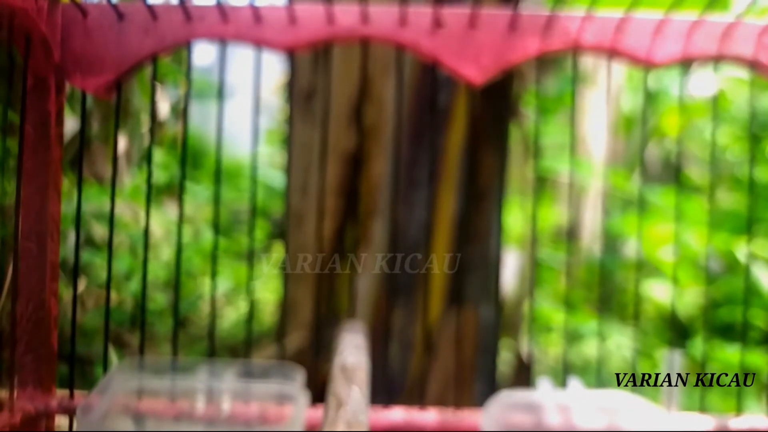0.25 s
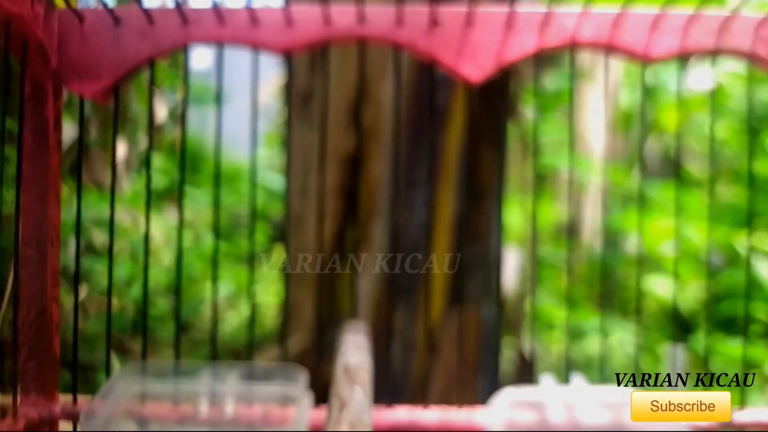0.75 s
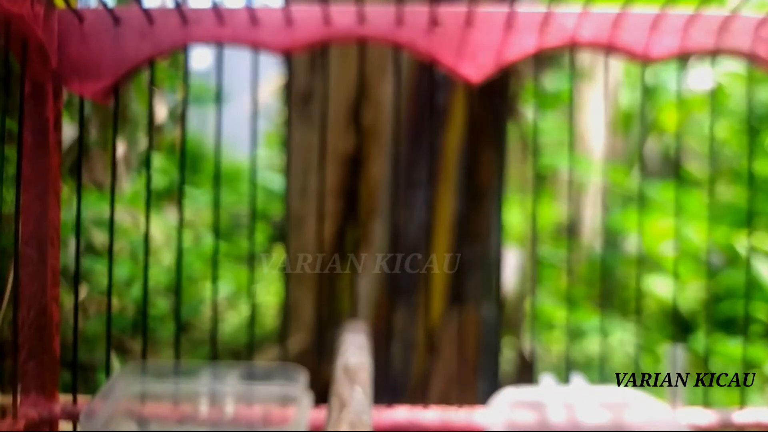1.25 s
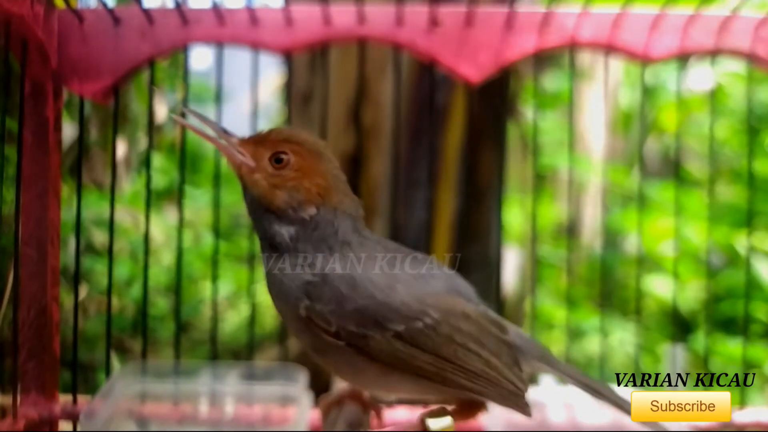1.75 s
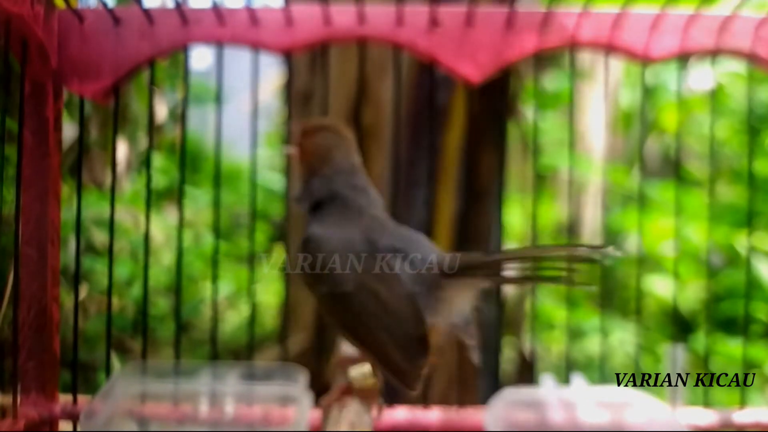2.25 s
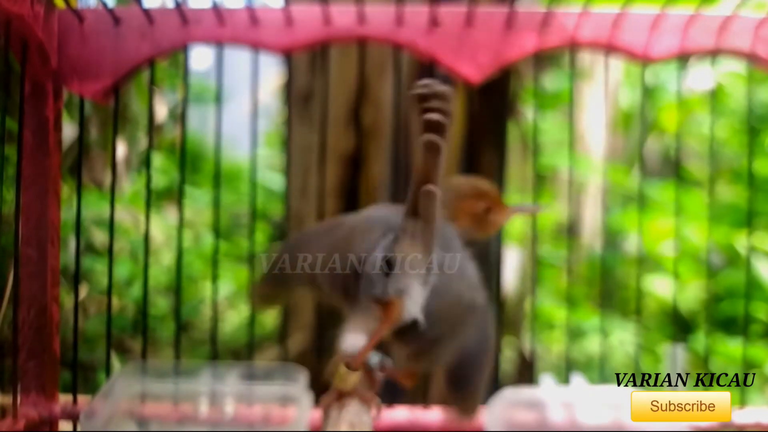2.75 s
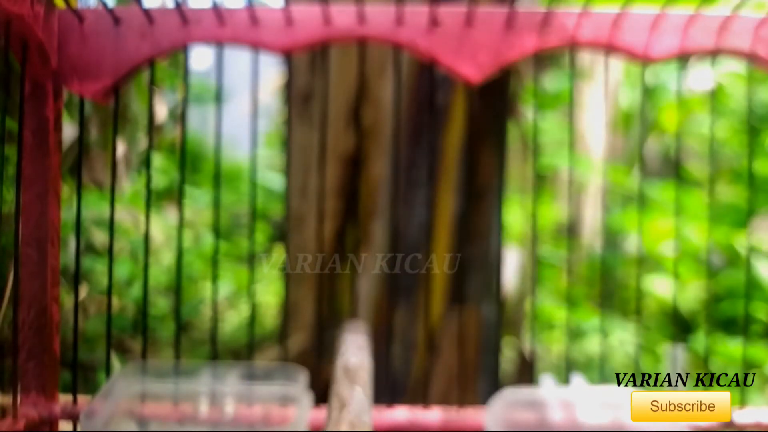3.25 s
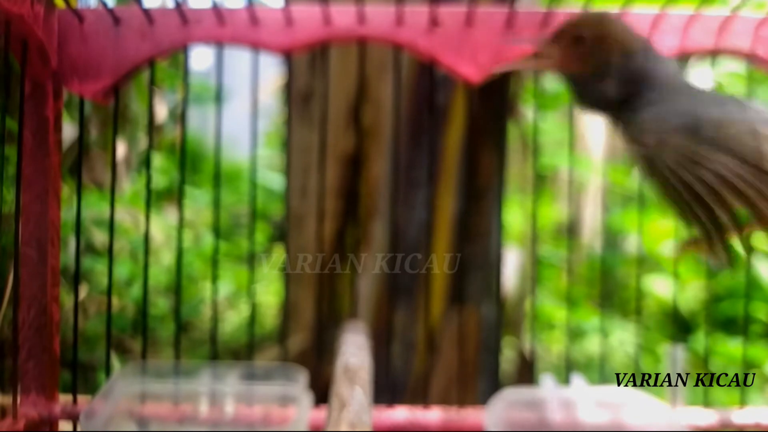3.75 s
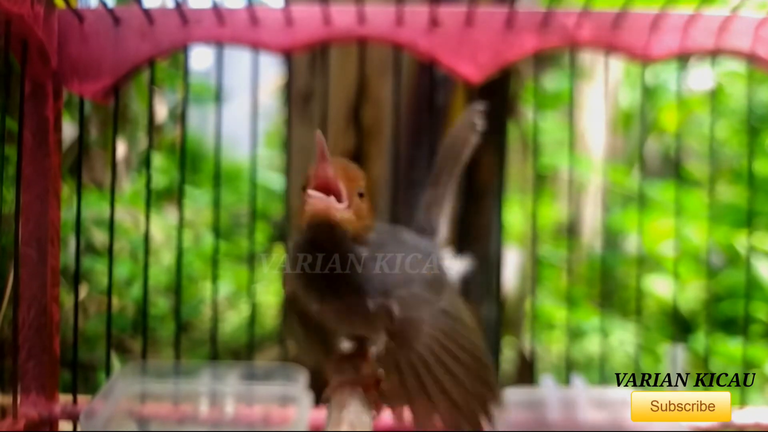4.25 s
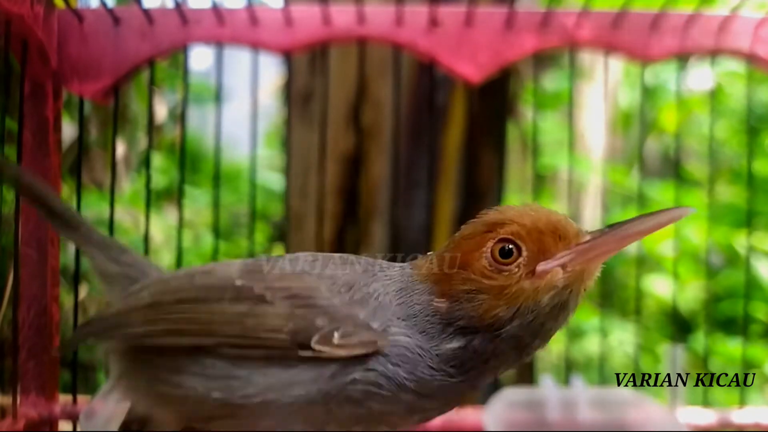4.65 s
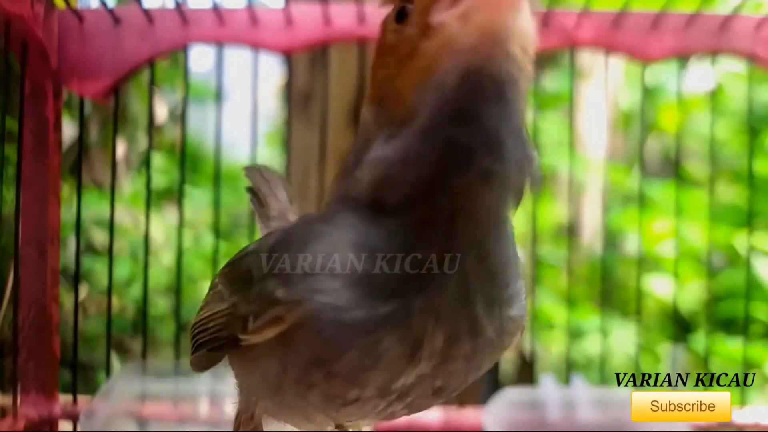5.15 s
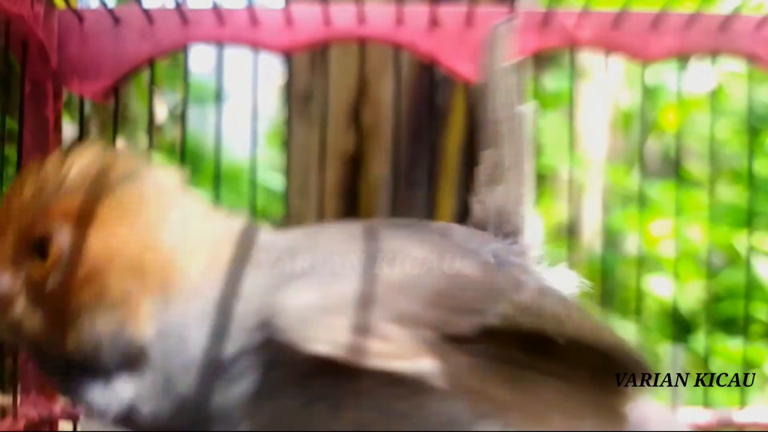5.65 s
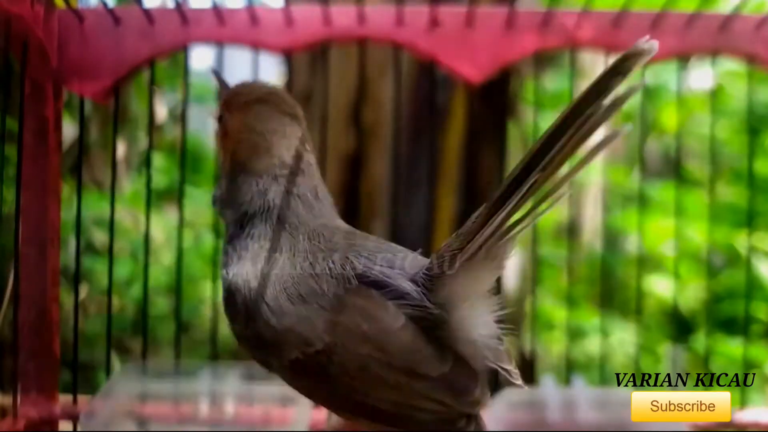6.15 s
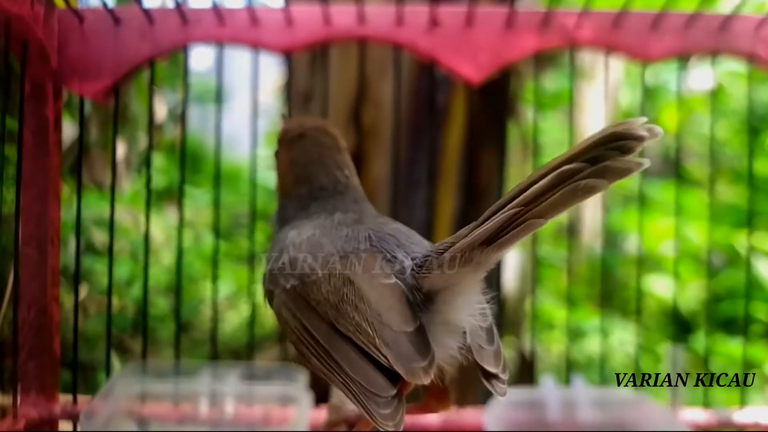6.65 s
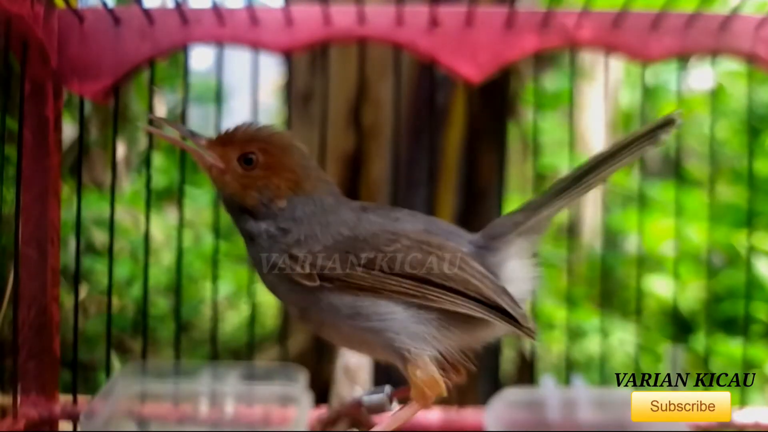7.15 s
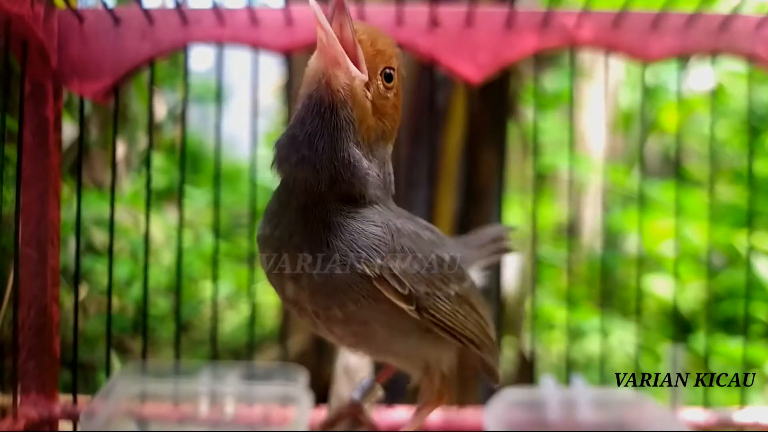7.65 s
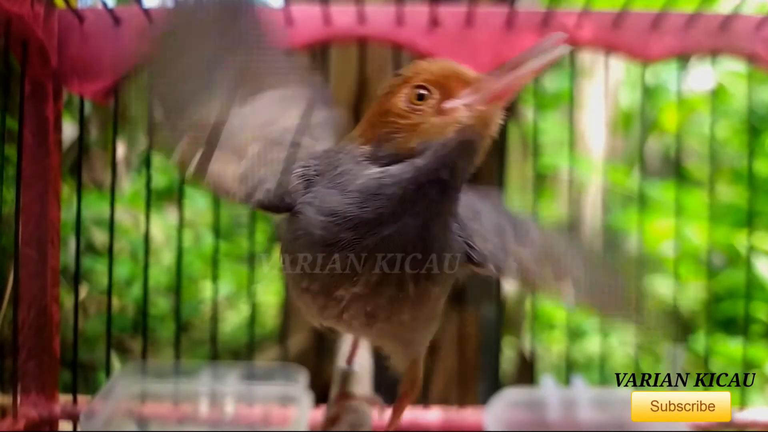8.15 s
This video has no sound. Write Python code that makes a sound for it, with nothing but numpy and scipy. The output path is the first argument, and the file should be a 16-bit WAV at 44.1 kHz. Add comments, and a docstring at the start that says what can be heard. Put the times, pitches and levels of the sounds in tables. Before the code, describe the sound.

A very close, loud small bird sings seven short ringing phrases, roughly one to one and a half seconds apart, shifting between left and right. Hops bring soft feather flutter, dry wing snaps, claw ticks and dull cage knocks. Other birds chatter in quick descending trills with light yard echo, while a distant motor putters low beneath thin open-air noise.

```python
"""A cage in a yard: a tailorbird sings seven times right at the microphone, loud enough to overload it.
Each song is a gliding, partly rough tone: a quick rise, a long level whistle, then a plunge and an arch.
Between songs it hops and snaps its wings in shaped noise bursts; landings ring the cage as decaying sines.
Other tailorbirds further off sing the same song and a trill, with more of the yard's echo.
A distant engine putters in filtered pulses, with a faint sinking whine and a bed of air noise."""
import sys
import numpy as np
from scipy import signal
from scipy.fft import rfft, irfft, next_fast_len
from scipy.io import wavfile
from scipy.ndimage import uniform_filter1d, map_coordinates

SR = 44100
rng = np.random.default_rng(int(sys.argv[2]) if len(sys.argv) > 2 else 0)


def materialize(psi):
    """Save the field psi as 16-bit PCM at rate SR to the path in sys.argv[1].

    A 1-D psi becomes a single channel; in a 2-D psi each row is a channel.
    """
    bounded = np.clip(np.atleast_2d(psi).T, -1, 1)
    quanta = np.round(bounded * 32767).astype(np.int16)
    wavfile.write(sys.argv[1], SR, quanta)


N = 369999


def amp(db):
    """Decibels to gain."""
    return 10 ** (np.asarray(db) / 20)


def unit(x):
    """Scaled to rms 1."""
    return x / np.sqrt(np.mean(x ** 2) + 1e-20)


def along(points, hz):
    """Read (Hz, value) points on a log frequency axis."""
    f, v = np.transpose(points)
    return np.interp(np.log(hz + 1), np.log(f + 1), v)


def curve(rows):
    """(s, value) rows as one value per sample."""
    return np.interp(np.arange(N) / SR, *np.transpose(rows))


def wobble(rate, n):
    """A smooth random curve of n samples, with rate knots a second."""
    knots = rng.standard_normal(int(n * rate / SR) + 4)
    return map_coordinates(knots, [np.arange(n) * rate / SR])


def filtered(x, response):
    """x shaped by a complex response of frequency."""
    n = x.shape[-1]
    m = next_fast_len(n + 2048)
    return irfft(rfft(x, m) * response(np.fft.rfftfreq(m, 1 / SR)), m)[..., :n]


def noise(spectrum, n):
    """Stereo noise of rms 1, most alike in the bass and nearly unrelated in the treble."""
    # left-right correlation: freq_hz, likeness (0-1)
    alike = [(40, 0.27), (120, 1), (400, .45), (1500, 0.1), (8000, 0.11)]

    def mid_side_response(hz):
        turn = np.arccos(np.clip(along(alike, hz), -1, 1)) / 2
        return amp(along(spectrum, hz)) * [np.cos(turn), np.sin(turn)]

    mid, side = filtered(rng.standard_normal((2, n)), mid_side_response)
    return unit(np.array([mid + side, mid - side]))


def add(track, s, sound):
    """Mix a sound into the track at time s."""
    part = track[:, max(round(s * SR), 0):][:, :sound.shape[-1]]
    part += sound[..., :part.shape[1]]


def engine(level_db=4, rumble_db=0, pan_db=-1.1, left_lead_s=.00045):
    """Uneven exhaust puffs from far away, blurred into a low rumble in which single tones swell."""
    # loudness before level_db is added: time_s, level_db
    putter_levels = [(0.0, -52.5), (0.47, -56), (0.84, -55.5), (1.24, -46.5), (1.8, -50), (4.74, -56),
                     (5.07, -52), (5.37, -54.5), (5.98, -51), (6.71, -52.5), (7.03, -48), (7.57, -49.5),
                     (7.97, -50.5), (8.39, -50)]
    # firing rate: time_s, firings_per_s
    firing_rate = [(.8, 19), (1.1, 22.5), (1.5, 22.5), (2.1, 20), (5.8, 21), (8.4, 20)]
    # exhaust colour: freq_hz, relative_level_db (per Hz)
    exhaust_colour = [(15, -45), (25, -16), (80, 0.5), (103, -1.5), (146, -2), (221, -17.5), (248, -20),
                      (365, -26), (425, -39.5), (500, -30.5), (650, -54.5), (1100, -120)]
    # tones that swell in the hum: start_s, length_s, pitch_hz, level_db (before the pan)
    hums = [(0, 0.3143, 77.2, -57), (.87, 0.49, 116, -48), (1.55, 1, 137.5, -53), (8.149, 0.28, 63.2, -48)]

    # one pulse each time the running count of firings passes a whole number
    count = np.floor(np.cumsum(curve(firing_rate)) / SR)
    firings = np.diff(count, prepend=0) * amp(1.0 * wobble(38, N))

    def exhaust_response(hz):
        blur = np.exp(-2j * np.log(hz + 1) ** 2)  # delays each pitch differently
        return amp(along(exhaust_colour, hz)) * blur

    puffs = unit(filtered(firings, exhaust_response))
    rumble = amp(rumble_db) * noise(exhaust_colour, N)
    sound = amp(curve(putter_levels) + level_db) * unit(puffs + rumble)
    for s, length, hz, db in hums:
        n = round(length * SR)
        tone = np.sin(2 * np.pi * hz * np.arange(n) / SR + .4 * wobble(18, n))
        add(sound, s, amp(db) * unit(np.hanning(n) ** .5 * tone))
    left = amp(pan_db) * sound[0]
    right = amp(-pan_db) * np.roll(sound[1], round(left_lead_s * SR))
    return np.array([left, right])


def air(level_db=-60):
    """Open air as broad noise whose level drifts slowly."""
    # air colour: freq_hz, relative_level_db (per Hz)
    air_colour = [(150, -20), (250, 0), (560, -9), (830, -10), (1500, -15), (2400, -15.5), (4000, -18),
                  (7300, -22), (10000, -22), (16000, -30)]
    return amp(level_db + wobble(3.2, N)) * noise(air_colour, N)


def syrinx(shape, length, stretch=1, jitter=0.018, flutter_db=2, rasp_db=-20, doubled_db=-7,
           shimmer_db=6.0, edge_db=3, smear=.9, overtone_smear=0.44):
    """One note of rms 1 from the voice organ: a gliding tone that shakes and hisses where it is rough."""
    # hiss colour: freq_hz, relative_level_db (per Hz)
    rasp_colour = [(400, -18.5), (1300, -11.5), (2500, -4.5), (3800, -3), (4700, -10.5), (6000, -8.5),
                   (7500, -7), (10000, -4.5), (13000, -14), (15300, -18.5)]
    # overtones that pass the throat and open beak: freq_hz, level_db (against the fundamental)
    throat = [(1450, -51.5), (4400, -33.5), (5100, -38.5), (5900, -39.5), (7300, -38), (8800, -39.5),
              (11700, -44.5), (13200, -47.5), (14700, -27.5), (16000, -19.5)]

    n = round(length * SR)
    ms, *columns = np.transpose(shape)
    place = np.linspace(0, ms[-1], n)  # the shape is fitted to the note's length
    hz, db, rough = [uniform_filter1d(np.interp(place, ms, c), size=60) for c in columns]
    drift = .003 * wobble(25, n)
    shake = (0.0016 + jitter * rough) * wobble(900, n)
    hz = stretch * hz * (1 + drift + shake)
    phase = 2 * np.pi * np.cumsum(hz) / SR
    tone = np.sin(phase)
    for halves in 1, 3, 4, 5, 6, 7, 8, 9, 10:
        k = halves / 2  # a slightly doubled period puts weak, fuzzy lines between the overtones
        between = halves % 2
        emphasis = doubled_db if between else edge_db * rough
        level = along(throat, k * hz) + emphasis + shimmer_db * wobble(35, n)
        fuzz = (smear if between else overtone_smear) * wobble(160, n)
        tone = tone + amp(level) * np.sin(k * phase + fuzz) * (k * hz < SR / 2)
    flutter = .5 * wobble(35, n) + flutter_db * rough * wobble(700, n)
    loudness = amp(db + flutter) * signal.windows.tukey(n, 80 / n)  # 40-sample fades
    return unit(loudness * (unit(tone) + amp(rasp_db) * rough * noise(rasp_colour, n)))


def ports(note, pan_db, lead_ms, bounce_db, reach):
    """A note at the two microphones: surfaces within reach (s) comb each side differently, and one side leads."""
    # how much of lead_ms each pitch keeps: freq_hz, share (0-1)
    lead_share = [(3000, 1), (4200, 0.42)]

    sides = np.pad(note, [(0, 0), (0, 512)])
    bounces = np.zeros((2, 512))
    bounces[:, 0] = 1  # the direct sound
    delays = np.clip(reach * SR * rng.random((2, 5)), 20, 511).astype(int)
    bounces[[[0], [1]], delays] = amp(bounce_db) * rng.standard_normal(delays.shape)
    combed = signal.fftconvolve(sides, bounces, axes=1)[:, :sides.shape[1]]
    # combing leaves each side's level as it was
    combed = combed * sides.std(axis=1, keepdims=True) / combed.std(axis=1, keepdims=True)
    half = np.array([[.5], [-.5]])  # pan and lead are split between left and right

    def lead_response(hz):
        return np.exp(2j * np.pi * hz * half * along(lead_share, hz) * lead_ms / 1000)

    return amp(half * pan_db) * filtered(combed, lead_response)


def song(rises, whistles, arches, bounce_db, reach):
    """A tailorbird's three notes on fixed shapes; the glides are combed, the held note stays more even."""
    # note shapes: into_note_ms (fitted to each length), pitch_hz (before the drift below),
    # relative_level_db, roughness (0-1)
    rise_shape = [(0, 1850, -27, .3), (3.885, 2280, -9, 1), (10.53, 2950, -1, 0), (18.5, 3450, 2.5, 0.7),
                  (24.115, 3600, -23.5, .7)]
    whistle_shape = [(0, 4400, -13, 0.72), (2.504, 4250, 2, .6), (10.6, 3500, 2.5, 1),
                     (21.85, 2740, -5.5, 1), (37, 2640, -8.5, .15), (79.64, 2865, -2.5, 0.046),
                     (119, 2908, 0.5, 0.04), (182.4, 2935, 2, 0.046), (193.2, 2800, -18, .2)]
    arch_shape = [(0, 4400, -5, 0.67), (1.92, 4100, 4, 0.33), (8.96, 2900, 6.5, 1),
                  (21.56, 1660, -14, 0.74), (39.26, 2100, -5, 1), (52.229, 2750, 3.5, 0.45),
                  (66.2, 2600, 2.5, 0.61), (85.4, 1960, -8, 0.91), (95.4, 1527, -26.5, 0.49)]
    # the voice sags through most of the bout, then recovers: time_s, pitch_factor
    pitch_drift = [(.4, 1.005), (1.4, 1.004), (2.4, 1.003), (3.9, .997), (7.8, 1)]

    track = np.zeros((2, N))
    # shape, notes, comb_db (added to bounce_db)
    parts = (rise_shape, rises, 0), (whistle_shape, whistles, -12), (arch_shape, arches, -2)
    for shape, notes, comb_db in parts:
        for s, length, db, pan_db, lead_ms in notes:
            note = syrinx(shape, length, stretch=np.interp(s, *np.transpose(pitch_drift)))
            add(track, s, amp(db) * ports(note, pan_db, lead_ms, bounce_db + comb_db, reach))
    return track


def far_song(whistle_db=-5, left_lead_ms=0.11):
    """Another tailorbird sings the same three notes in a fixed rhythm; its whistle is weaker than its rise."""
    # songs: arch_start_s, opening_level_db (rise; whistle_db is added for the whistle), arch_level_db
    far_songs = [(.03, -70, -60.5), (1.052, -66, -53), (3.455, -54, -57), (4.908, -52, -54.5),
                 (7.333, -53, -59.5)]
    # its rise, whistle and arch: after_arch_start_s, length_s
    far_rhythm = [(-.26, .027), (-.22, .175), (0, .085)]

    notes = [[], [], []]
    for s, opening_db, arch_db in far_songs:
        levels = opening_db, opening_db + whistle_db, arch_db
        for rows, (after, length), db in zip(notes, far_rhythm, levels):
            if s + after > 0:  # notes due before the start are left out
                rows.append((s + after, length, db, 0, left_lead_ms))
    return song(*notes, bounce_db=-7, reach=.011)


def trill(chip_db=-6, length=.026, scatter_db=2.5, slowing_s=0.001, sag_hz_per_s=600):
    """Runs of short arched chips that slow down and sink in pitch, heard through scattering leaves."""
    # runs: start_s, length_s, first_gap_s, first_level_db (before chip_db and scatter),
    # level_change_db_per_s, first_pitch_hz (for the 4000 Hz reference of the chip shape)
    trill_runs = [(0.133, .42, 0.054, -51, 25, 4336), (1.169, .42, .05, -47, 24, 4314),
                  (3.488, 1, 0.05, -41, -1.5, 4300), (4.965, .8, .0533, -38, -17, 4108),
                  (7.332, 1, .0528, -38, -8, 4076)]
    # one chip: into_chip_ms (fitted to its length), pitch_hz (before stretch), relative_level_db, roughness (0-1)
    chip_shape = [(0, 3450, -22, .3), (6, 3850, -5, .3), (13, 4100, 0, .3), (20, 3900, -4, .4),
                  (26, 3400, -13, .5), (32, 2900, -26, .5)]

    track = np.zeros((2, N))
    for s, run_length, gap, db, db_per_s, hz in trill_runs:
        k = np.arange(20)
        times = gap * k + slowing_s * k * (k - 1) / 2  # each gap is slowing_s longer than the last
        for t in times[times < run_length]:
            chip_length = length * np.exp(.1 * rng.standard_normal())
            stretch = (hz - sag_hz_per_s * t) / 4000
            chip = syrinx(chip_shape, chip_length, stretch=stretch, doubled_db=-24.5, edge_db=-29.5)
            scattered = ports(chip, 0, .04, bounce_db=-8, reach=.011)
            level = db + db_per_s * t + chip_db + scatter_db * rng.standard_normal()
            add(track, s + t, amp(level) * scattered)
    return track


def near_song():
    """The caged bird's seven songs, with weak reflections from surfaces close by."""
    # notes: start_s, length_s, level_db, left_over_right_db, left_lead_ms (full lead, at low pitch)
    rises = [(.277, 0.024, -12.5, -12, -0.13), (1.272, .025, -9, 0.5, -.09), (2.275, 0.036, -11, 1, -0.038),
             (3.774, 0.02686, -12, -5.5, -0.11), (5.231, .025, -6, 0.5, .07),
             (6.332, 0.026, -7.5, 8, -0.13), (7.726, 0.030006, -6.5, 4, 0.1632)]
    whistles = [(.319, .2, -11, -6, -0.14027), (1.314, .19, -13, 2, 0), (2.328, .18, -12, 2, -0.025),
                (3.813, 0.18942, -12.5, -2, .06), (5.271, .19, -5.5, -2.5, 0.099),
                (6.375, .19, -13.5, 14, 0.12), (7.77, 0.2, -8, -1, 0.09821)]
    arches = [(.569, 0.1, -14.5, -7.5, -0.092), (1.562, 0.094, -12.5, -2, 0.1),
              (2.568, 0.11, -15.5, -0.5, -0.076), (4.059, 0.097, -12.5, 2.5, -0.14),
              (5.522, 0.091, -8.5, -0.5, 0.12), (6.635, 0.085, -10.5, 2.5, -0.12638),
              (8.028, 0.087, -9, 1.5, .12)]
    return song(rises, whistles, arches, bounce_db=-12.5, reach=.003)


def wings(snap_db=-7, snap_t60=0.024, snap_gap_s=.0135, beats=22, beat_db=3):
    """Sharp wing snaps, and soft rustles on each hop that pulse with the wingbeat (beats a second)."""
    # rustling feathers: start_s, length_s, level_db (before swell and pulse)
    hops = [(.89, 0.12, -58), (1.64, 0.075, -48), (1.985, 0.16, -59.5), (2.858, 0.3259, -57.5),
            (4.714, .18, -59), (5.05, 0.44, -54), (5.756, 0.19812, -55.5), (7.124, 0.13, -59.5)]
    # feather colour: freq_hz, relative_level_db (per Hz)
    feather_colour = [(500, -7.5), (2000, -2), (4000, -6), (7500, -1), (12000, -1), (15500, -0.5)]
    # bursts of snaps: start_s, length_s, first_level_db (before snap_db), growth_db_per_snap
    snap_bursts = [(2.169, .05, -21, 0.5), (3.156, .02, -39, -1.5), (6.23, .035, -18.5, 4.5),
                   (7.432, .01, -36.5, -10.5)]
    # snap colour: freq_hz, relative_level_db (per Hz)
    snap_colour = [(410, -81), (700, -42.5), (2110, -15), (3400, -17), (4080, -7), (6340, -6.5),
                   (7500, -17.5), (10200, -22.5), (12100, -20.5), (15500, -20)]

    track, t = np.zeros((2, N)), np.arange(SR // 20) / SR
    snap = amp(snap_db - 60 * np.abs(t - .0012) / snap_t60) * np.minimum(t / 0.00031, 1)
    for s, length, db, growth_db in snap_bursts:
        for k, after in enumerate(np.arange(0, length, snap_gap_s)):
            add(track, s + after, amp(db + growth_db * k) * snap * noise(snap_colour, len(t)))
    for s, length, db in hops:
        n = round(length * SR)
        pulse_db = beat_db * np.sin(2 * np.pi * beats * np.arange(n) / SR)
        flap = amp(pulse_db + 2 * wobble(200, n))
        add(track, s, amp(db) * np.hanning(n) ** .5 * flap * noise(feather_colour, n))
    return track


def landings(attack=0.003, claw_t60=0.02):
    """The claws tick on the perch, which softly takes the bird's weight, and the cage thuds in damped modes."""
    # landings that shake the cage: start_s, thud_peak_db, claw_tick_db
    touchdowns = [(2.048, -38, -38), (2.99, -37, -51), (5.84, -38, -43), (6.175, -23.5, -57)]
    # cage resonances: pitch_hz, t60_s, relative_level_db
    cage_modes = [(62, 0.088, 2.5), (100.5, 0.046, 5.5), (197, 0.055, 3.5), (338, 0.042, -6.5),
                  (558, 0.028, -26)]
    # claw tick colour: freq_hz, relative_level_db (per Hz)
    claw_colour = [(300, 3), (1200, -8.5), (5000, -14.5), (12000, -22)]

    track, t = np.zeros((2, N)), np.arange(SR // 3) / SR
    ring = sum(amp(db - 60 * t / t60) * np.sin(2 * np.pi * hz * t) for hz, t60, db in cage_modes)
    thud = ring * (1 - np.exp(-(t / attack) ** 2))
    thud = thud / np.abs(thud).max()
    for s, db, claw_db in touchdowns:
        tick = amp(claw_db - 60 * t / claw_t60) * noise(claw_colour, len(t))
        add(track, s, amp(db) * thud + tick)
    return track


def whine():
    """A very faint, fuzzy whine that sinks, as of a motor slowing far off."""
    # its glide: time_s, pitch_hz, level_db
    whine_glide = [(2.1, 1148, -96.5), (2.4, 1116, -77), (3.15, 973, -67.5), (3.7, 844.4, -71.5),
                   (4.1, 800, -95)]
    hz, db = [curve(np.array(whine_glide)[:, [0, column]]) for column in (1, 2)]
    phase = 2 * np.pi * np.cumsum(hz) / SR
    return amp(db) * unit(sum(wobble(96, N) * np.sin(k * phase) for k in (1, 1.55, 2)))


def yard(x, tail_db=-27, wall_db=-33, wall_delay=0.032):
    """A thin outdoor tail and one smeared echo off a wall, both made of decaying noise."""
    # decay of the tail: freq_hz, t60_s
    tail_decay = [(300, 0.46), (2500, 0.27), (4500, 0.33), (9000, 0.062), (15000, 0.043)]

    hz, t, z = signal.stft(rng.standard_normal((2, SR // 2)), SR, nperseg=256)
    tail = signal.istft(z * amp(-60 * t / along(tail_decay, hz)[:, None]), SR, nperseg=256)[1]
    since = np.arange(tail.shape[1]) / SR - wall_delay
    wall = rng.standard_normal(tail.shape) * (since > 0) * amp(-60 * np.abs(since) / .07)
    answer = amp(tail_db) * tail / np.linalg.norm(tail[0]) + amp(wall_db) * wall / np.linalg.norm(wall[0])
    colour = [(3500, 0.5), (8000, 12.5), (15000, -9.5)]  # freq_hz, gain_db
    coloured = filtered(answer, lambda f: amp(along(colour, f)))
    return signal.fftconvolve(x, coloured, axes=1)[:, :N]


def scene(far_wet_db=16, trill_wet_db=12):
    """The near bird is almost dry; the far birds reach the cage mixed with more of the yard."""
    near = near_song() + wings() + landings()
    far, mate = far_song(), trill()
    echoes = yard(near + amp(far_wet_db) * far + amp(trill_wet_db) * mate)
    return near + far + mate + echoes + engine() + whine() + air()


def record(dry, ceiling=0.5, hardness=7, top_hz=15750):
    """Each channel flattens the loudest peaks, adding odd overtones; a steep cut removes what lies above top_hz."""
    # the microphone's treble colour: freq_hz, gain_db
    mic_colour = [(11000, -0.5), (13200, 3), (14600, -2)]

    fine = signal.resample_poly(dry, 2, 1, axis=1)  # twice the rate, against aliasing
    clipped = fine / (1 + np.abs(fine / ceiling) ** hardness) ** (1 / hardness)
    coarse = signal.resample_poly(clipped, 1, 2, axis=1)
    return filtered(coarse, lambda hz: amp(along(mic_colour, hz)) / (1 + (hz / top_hz) ** 120))


dry = scene()
out = record(dry)
materialize(out)
```